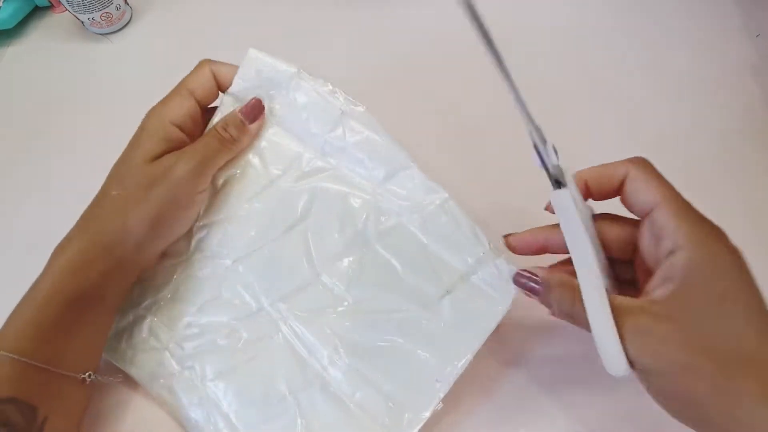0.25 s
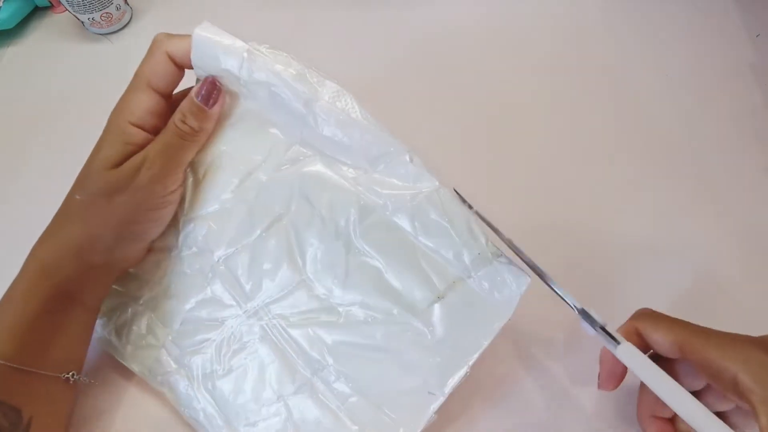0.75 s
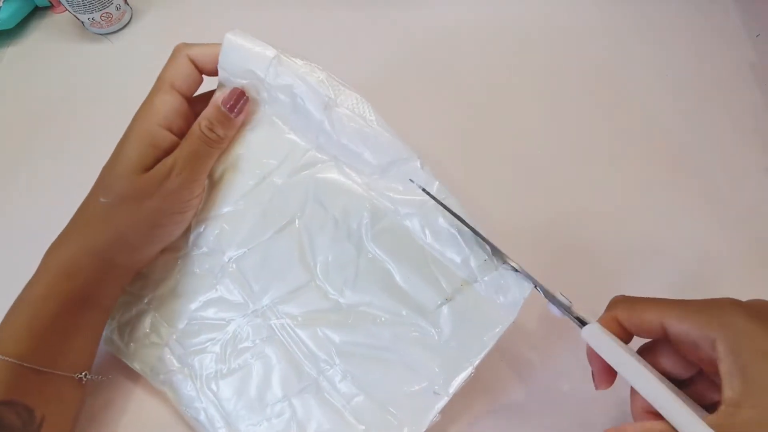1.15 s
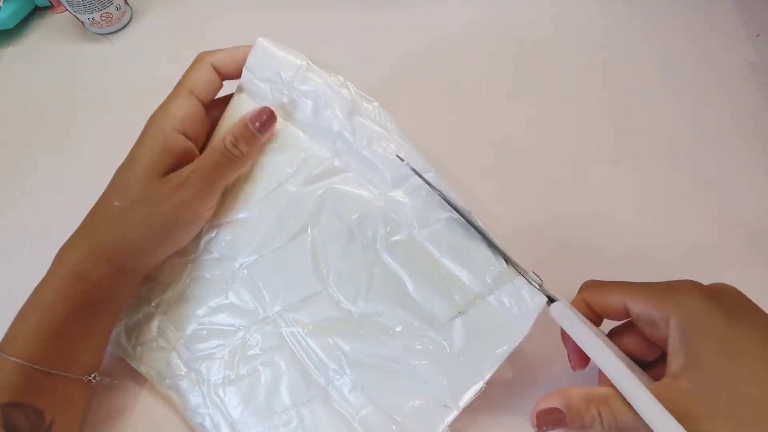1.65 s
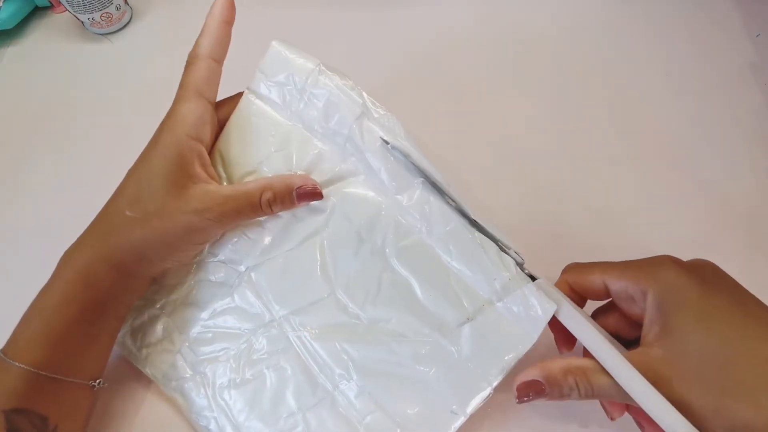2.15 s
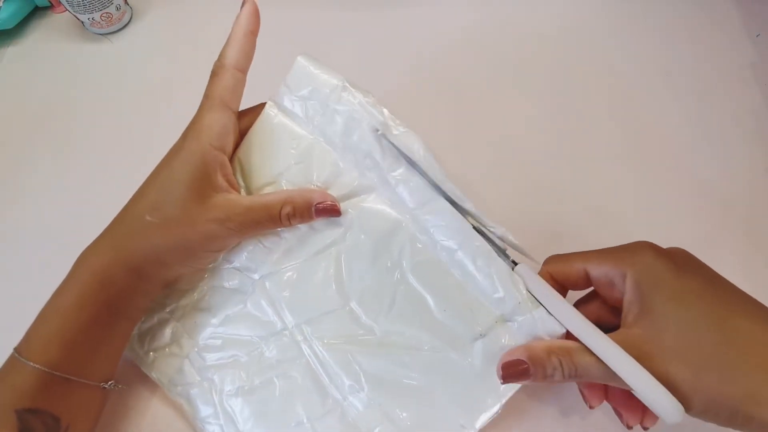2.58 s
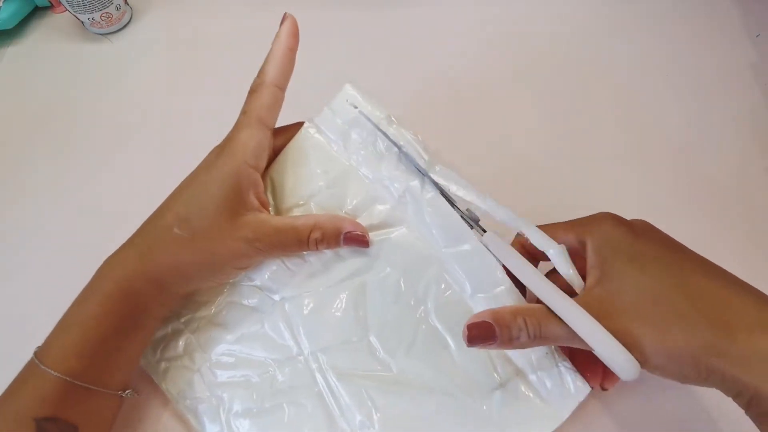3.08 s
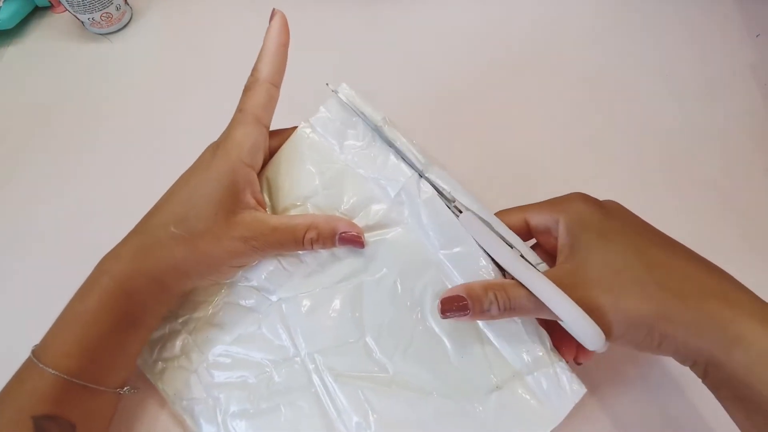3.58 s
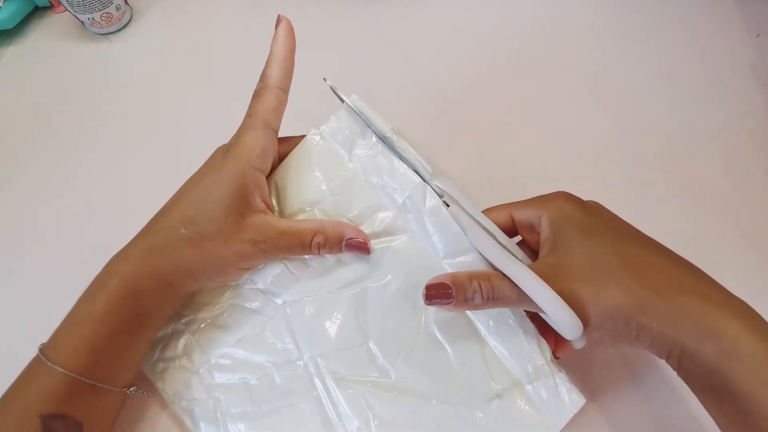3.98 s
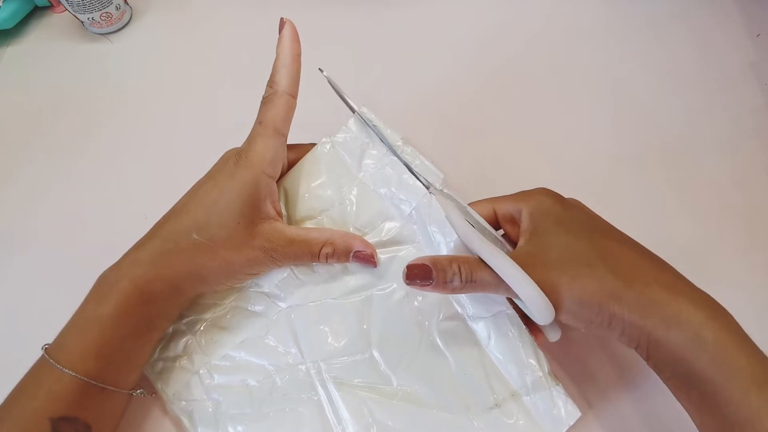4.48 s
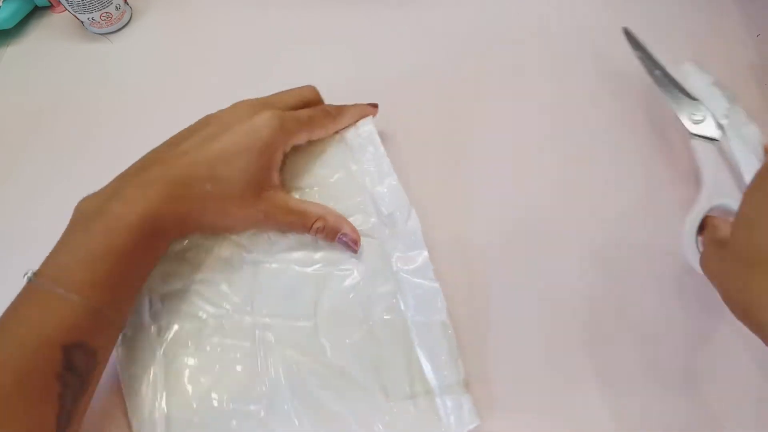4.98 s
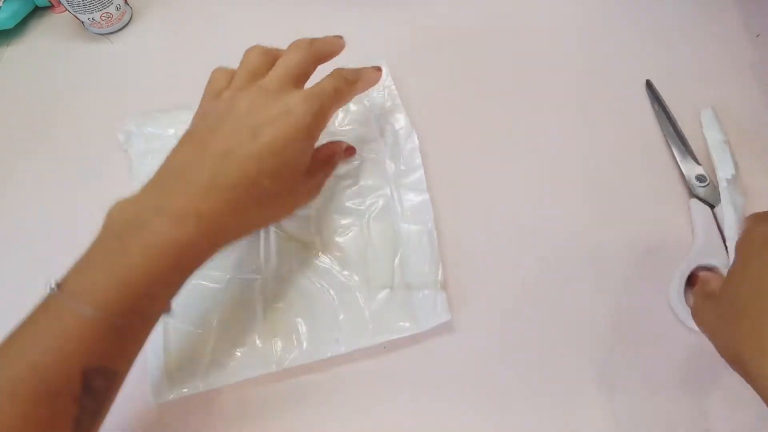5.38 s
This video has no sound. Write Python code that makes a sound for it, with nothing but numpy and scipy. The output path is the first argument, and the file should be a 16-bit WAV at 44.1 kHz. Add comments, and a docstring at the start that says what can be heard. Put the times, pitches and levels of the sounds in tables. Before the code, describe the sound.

A plastic pouch crinkles, then scissors snip and rasp through it in uneven cuts before knocking down on a table.

```python
"""A plastic mailing pouch crinkles and bumps softly as hands shift it on a table in a small room.
Then scissors cut along its top, close to a stereo microphone. The blades rasp open and shut in
thousands of tiny slips on the plastic film, and creases snap as they give way.
A last loud snip frees the strip; the pouch slides away and the scissors knock down on the table."""
import sys
import numpy as np
from scipy import signal
from scipy.fft import rfft, irfft
from scipy.io import wavfile
from scipy.ndimage import uniform_filter1d

SR = 44100
rng = np.random.default_rng(int(sys.argv[2]) if len(sys.argv) > 2 else 0)


def file_out(sig):
    """Save sig as 16-bit WAV at sys.argv[1]."""
    # one column per channel
    cols = np.atleast_2d(sig).T
    # limit, then scale
    lim = np.clip(cols, -1, 1)
    pcm = np.round(lim * 32767).astype(np.int16)
    wavfile.write(sys.argv[1], SR, pcm)


N = 248724

# The quiet room's tone. Each row: frequency in Hz, relative level in dB.
HUSH_TONE = [(12, -14), (25, 17), (42, 3.5), (105, 1), (170, -15), (250, -14), (330, -3), (470, -18.5),
             (780, -36), (1300, -20), (3600, -25), (8000, -49), (16000, -64)]
# The room's echo. Each row: frequency in Hz, seconds to fade by 60 dB.
ECHO_FADE = [(200, 0.47), (1000, 0.11), (4000, 0.28), (10000, 0.23), (16000, 0.33)]
# How alike the microphone's two sides sound. Each row: frequency in Hz, likeness from 0 to 1.
STEREO_LIKENESS = [(100, 0.92), (600, 0.83), (1400, 0.48), (3000, 0.24), (7000, 0.67), (15000, 1)]
# The stereo balance. Each row: frequency in Hz, how much louder the left is in dB.
LEFT_LEAN = [(60, -2), (200, -0.5), (600, 3), (2400, 3), (4400, 1.5), (8000, 0.6), (14000, 7)]
# Hands bump the pouch and table. Each row: start in seconds, level in dB, pitch in Hz.
HAND_BUMPS = [(0.032, -42, 212), (0.064, -41.5, 78), (0.305, -63, 300), (0.763, -49, 147),
              (1.195, -40, 376), (1.607, -49, 150.1), (2.151, -48, 172), (2.18, -51, 326),
              (2.526, -39.5, 135), (2.555, -44, 323), (2.587, -46.5, 204), (2.681, -53, 385),
              (2.745, -54, 193), (4.295, -37, 66.4), (4.451, -43.5, 55.3), (4.615, -37.5, 72.6),
              (4.832, -40.5, 67.5), (5.305, -32, 70.6), (5.534, -46.5, 162)]
# The scissors land and rock. Each row: start in seconds, relative level in dB.
SCISSOR_KNOCKS = [(5.288, -28.5), (5.328, -34)]
# The table's ringing notes. Each row: pitch in Hz, relative level in dB, seconds to fade by 60 dB.
TABLE_NOTES = [(69.1, -31, 0.047), (172.3, -3, 0.041), (351, -4.5, 0.14), (370.4, -4, 0.14),
               (498, -14, 0.11), (892, -1, 0.041)]
# The plastic film's tone. Each row: frequency in Hz, relative level in dB.
FILM_TONE = [(100, 18), (250, -6.5), (450, -2.5), (650, 1), (1000, 1), (1300, -5), (2500, -1), (4500, -2),
             (8000, -3.5), (12000, -1), (15000, -7), (16000, -12)]
# Where pouch and blades ring. Each row: pitch in Hz, width in Hz, boost in dB.
FILM_PEAKS = [(376, 28, 6.5), (780, 54, 5), (1580, 480, 5), (5840, 3800, 4), (6750, 240, 3.5)]
# Sharp snaps of film and blades. Each row: start in seconds, levels of the lows, middle and highs
# in dB, pitch in Hz of the facet (a small flat patch of film) that rings.
SHARP_SNAPS = [(0.03, -56, -50.5, -53, 2280), (0.0638, -61.5, -46.5, -49, 3200),
               (0.0904, -52.5, -46, -53, 2950), (0.1658, -38, -47.5, -53, 920),
               (0.1817, -45.5, -41, -56, 1320), (0.191, -67, -41, -53, 3180),
               (.2302, -47.5, -40, -42, 2840), (0.2606, -38.5, -38.5, -49, 620),
               (0.278, -59, -42.5, -57, 2830), (0.3052, -38, -38, -36.5, 704),
               (0.3866, -60, -46, -44, 6760), (0.4207, -55, -48, -37.5, 8400), (0.551, -54, -52, -75, 2170),
               (0.637, -66, -70, -45.5, 8950), (0.763, -49.5, -51, -46, 1000),
               (0.8018, -66, -60, -57, 9050), (1.0032, -59, -46.5, -54.5, 2960),
               (1.0784, -51, -50.5, -53, 807), (1.1319, -60, -52, -68, 603),
               (1.1967, -36.5, -37.5, -45, 1081), (1.2184, -69, -47.5, -55, 2820),
               (1.238, -72, -55.5, -65, 2890), (1.304, -80.5, -49, -51, 2320),
               (1.3368, -59, -45.5, -47.5, 3060), (1.3791, -47, -40.5, -37, 3247),
               (1.386, -57, -41, -41, 3470), (1.4443, -47.5, -46.5, -53, 820), (1.4598, -54, -49, -55, 850),
               (1.552, -51, -52, -55, 603), (1.6088, -43.5, -42, -41, 1670), (1.7061, -45, -50, -49, 785),
               (1.7869, -46.5, -40.5, -40.5, 2110), (1.8224, -50.5, -45, -44, 776),
               (1.9578, -52, -81, -48.5, 760), (2.1993, -42.5, -42, -39, 840),
               (2.221, -46.5, -57, -54, 900), (2.4204, -48, -47.5, -40.5, 746), (2.525, -36, -48, -40, 754),
               (2.5486, -46, -40.5, -42, 790), (2.628, -40, -40, -45, 820), (2.682, -46.5, -51, -50, 584.6),
               (2.7412, -69, -42, -62, 4540), (2.7743, -50, -51, -49, 781), (2.7998, -50, -42, -50, 5340),
               (2.8853, -50.5, -66, -56, 764), (2.9311, -52, -42, -38.5, 503), (2.9496, -40, -58, -56, 578),
               (3.0199, -45.5, -40.5, -36, 624), (3.0776, -44, -41.5, -39, 628),
               (3.133, -60, -39, -37.5, 2540), (3.155, -48, -47, -48, 600),
               (3.2108, -55, -51, -43.5, 10220), (3.2815, -53, -43, -42, 7400),
               (3.3212, -49.5, -43, -51, 2340), (3.4421, -59, -64, -44.5, 6690),
               (3.5397, -51.5, -46, -39.5, 10200), (3.5672, -55, -44, -34, 9100),
               (3.867, -53, -45.5, -43.5, 6470), (4.1332, -45, -41.5, -41, 1360),
               (4.345, -53, -42, -36.5, 5200), (4.37, -59, -43, -37, 6600), (4.632, -55, -38, -36.5, 5300),
               (4.6441, -35, -30, -27.5, 1640), (4.7778, -47, -56, -62, 790),
               (4.993, -41, -35.5, -42.5, 1640), (5.0138, -48, -53, -50, 1190),
               (5.2877, -38, -43.5, -38.5, 510), (5.3159, -45.5, -41, -55, 3900),
               (5.3279, -46.5, -60, -49, 472), (5.5236, -77, -51.5, -50, 6750)]
# Hands shift the pouch. Each row: start and length in seconds, hiss in dB, body (the lower sound) in dB
# above the hiss, pitch in Hz of the tightened panel of film, treble tilt in dB, grit from 0 to 1.
POUCH_RUSTLES = [(-0.002, 0.16, -53, -5, 2530, -2.5, 0.3), (0.145, 0.14, -43, -8.5, 1080, -7, 0.86),
                 (0.312, .075, -49, -6.5, 726, -6, 1), (0.422, .03, -47.5, -15, 720, -2.5, 0.5),
                 (0.467, 0.096, -63, -3, 694, -4.5, 0.67), (0.598, 0.066, -59, -6.5, 704, -3, 0.75),
                 (0.713, 0.07, -61, 3, 970, -5, 0.85), (0.968, 0.51, -60, -10, 700, -2.5, 0.63),
                 (1.2, 0.19, -59, -20, 712, -1, 1), (4.682, .08, -52, -3, 1580, 5, 0.23),
                 (4.767, 0.12, -44.5, -0.5, 1580, -5, .4), (4.888, 0.11, -48.5, -14.5, 1580, -3.5, 0.43),
                 (4.996, 0.25, -50, -5, 1078, 2, .25), (5.252, 0.061, -44.5, -11, 1870, -6.5, 0),
                 (5.313, 0.072, -51, -12, 500, -2, 0.2), (5.381, 0.18, -63.5, -22, 514, -2, 0.5)]
# The blades open and slide along the slit. Each row: start and length in seconds, hiss in dB,
# body in dB above the hiss, panel pitch in Hz, treble tilt in dB.
BLADE_SLIDES = [(1.514, 0.072, -48.5, -9, 684, -1.5), (1.949, 0.14, -49, -5.5, 771, -4),
                (2.317, .12, -48, -2.5, 777, 2.5), (2.47, 0.037, -54.5, -11, 770, -3.5),
                (2.846, 0.063, -53.5, -7.5, 780, -2), (3.42, 0.0866, -45, -9.5, 840, -0.5),
                (3.728, 0.11, -48, -2.5, 825, 0.5), (4.076, 0.036, -52, 1.5, 897, 2),
                (4.22, 0.043, -56, -5.5, 945, -5), (4.462, 0.13, -51.5, -7, 814, -2)]
# The blades close through the film. Each row: start and length in seconds, hardest bite as a share of
# the length, swell toward it in dB, hiss in dB, body in dB above the hiss, panel pitch in Hz,
# treble tilt in dB, grit from 0 to 1.
BLADE_CUTS = [(1.319, .13, 0.68, 8, -40, -13.5, 667, -3, 0.57),
              (1.598, .075, 1, 6.5, -43, -6, 674, -5, 0.2),
              (1.701, 0.15, 0.76, 6.5, -44, -5, 660, -0.5, 0.06),
              (2.138, 0.095, 0.61, 12, -39.5, -8.5, 736, -1, 0.13),
              (2.514, 0.12, .28, 8.5, -39, -1.5, 733, 0, 0.34),
              (2.664, 0.13, 0.84, 9, -39, -3.5, 502.4, -1, .7),
              (2.882, 0.11, 0.56, 15, -39, -4.5, 558, -2.5, 0.64),
              (3.047, 0.12, .45, 2.5, -44.5, -9.5, 612.6, 0.5, 0.51),
              (3.23, .1, 0.48, 2, -46, -6, 620, -3, 0.67), (3.557, 0.095, 0.5, 6, -45, 2, 2542, 2, 0.67),
              (3.883, .11, 0.18, 9, -43, -8, 1490, -4, 0.4),
              (4.115, 0.069, 0.45, 6.5, -43, -1, 940, 0, 0.34),
              (4.272, 0.073, 0.32, 6.5, -45.5, -4.5, 770, -1, 0.37),
              (4.607, 0.083, 0.33, 6.5, -41, -7.5, 1580, -2.5, 0.3)]

CUTOFF_HZ = 16200
STEP_S = 0.001  # time between points on a movement's curve
ONSET = SR // 100  # a snap's level is set over its first 10 ms


def amp(db):
    """Turns decibels into a gain."""
    return 10 ** (np.asarray(db) / 20)


def unit(x):
    """Scales a signal to an average (rms) level of 1."""
    return x / np.sqrt(np.mean(x ** 2) + 1e-20)


def read(points, hz):
    """Looks up a table by frequency, giving each octave equal room."""
    f, value = np.transpose(points)
    return np.interp(np.log(hz + 1), np.log(f), value)


def follow(curve, t):
    """Reads a movement's curve at times t."""
    return np.interp(t, np.arange(len(curve)) * STEP_S, curve)


def add(mix, s, sound):
    """Mixes a sound in at s seconds."""
    part = mix[:, max(round(s * SR), 0):][:, :sound.shape[-1]]
    part += sound[..., :part.shape[1]]


def band(x, low_hz, high_hz=SR / 2):
    """Keeps the sound between two frequencies."""
    edges_hz = [low_hz, min(high_hz, SR / 2 - 1)]
    return signal.sosfilt(signal.butter(3, edges_hz, "bandpass", fs=SR, output="sos"), x)


def stereo(sound, lag_s=0):
    """Three signals become two: both sides share the first (the left lag_s later) and get one each."""
    hz = np.fft.rfftfreq(sound.shape[1], 1 / SR)
    spectra = rfft(sound)
    likeness = np.clip(read(STEREO_LIKENESS, hz), 0, 1)
    shared = spectra[0] * np.exp(-2j * np.pi * hz * np.array([[lag_s], [0]]))
    return irfft(np.sqrt(likeness) * shared + np.sqrt(1 - likeness) * spectra[1:], sound.shape[1])


def room_hush(level_db=-59):
    """The room's steady low rumble and faint hiss."""
    tone = amp(read(HUSH_TONE, np.fft.rfftfreq(N, 1 / SR)))
    noise = irfft(rfft(rng.standard_normal((3, N))) * tone, N)
    return amp(level_db) * unit(stereo(noise))


def room_echo(x, first_echo_s=0.0049):
    """Sound bounces around the room, each frequency fading at its own speed."""
    hz, t, spectra = signal.stft(stereo(rng.standard_normal((3, SR // 2))), SR, nperseg=256)
    fade = amp(-60 * t / read(ECHO_FADE, hz)[:, None])
    tail = signal.istft(spectra * fade, SR, nperseg=256)[1]
    tail *= np.clip(np.arange(tail.shape[1]) / SR / first_echo_s - 1, 0, 1)
    return signal.fftconvolve(x, tail / np.linalg.norm(tail[0]), axes=1)[:, :N]


def bumps_and_knocks(bump_fade_s=0.089, bump_rise_s=0.00086, knock_trim_db=-4):
    """Soft hands make dull thuds; the hard scissors make the table top ring."""
    out, t = np.zeros((2, N)), np.arange(SR // 3) / SR
    for s, db, hz in HAND_BUMPS:
        noise = unit(band(rng.standard_normal((2, len(t))), hz / 2, hz * 2))
        thud = np.sin(2 * np.pi * hz * t) + 0.24 * noise
        add(out, s, thud * amp(db - 60 * t / bump_fade_s) * (1 - np.exp(-t / bump_rise_s)))
    ring = sum(amp(db - 60 * t / fade_s) * np.sin(2 * np.pi * hz * t) for hz, db, fade_s in TABLE_NOTES)
    for s, db in SCISSOR_KNOCKS:
        add(out, s, amp(db + knock_trim_db) * ring)
    return out


def film_response(size=2048):
    """How the pouch answers one tiny tap, with its own tone and ringing."""
    hz = abs(np.fft.fftfreq(size, 1 / SR))
    peaks_db = sum(boost / (1 + (2 * (hz - f) / width) ** 2) for f, width, boost in FILM_PEAKS)
    gain = amp(read(FILM_TONE, hz) + peaks_db)
    spectrum = np.exp(np.conj(signal.hilbert(np.log(gain))))  # no sound comes before the tap
    return np.fft.ifft(spectrum).real[:size // 2]


def buckle(film, facet_hz, facet_gain, ring_s, spike, lag_s, linger=0.17, size=2048):
    """One crease gives way: a click amid waves that scatter through the sheet and ring one facet."""
    t = np.arange(size) / SR
    burst = rng.standard_normal((3, size)) * (np.exp(-t / ring_s) + linger * np.exp(-t / 0.02))
    burst /= np.linalg.norm(burst, axis=1, keepdims=True)
    click_at = min(int(rng.random() * ring_s * SR / 2), size - 1)
    burst[0, click_at] += spike * rng.choice([-1, 1])
    notes_hz = [hz for hz in (facet_hz, 3.36 * facet_hz) if hz < CUTOFF_HZ]  # pitch and overtone
    burst += facet_gain * sum(signal.lfilter(*signal.iirpeak(hz, 8, fs=SR), burst) / 2 ** k
                              for k, hz in enumerate(notes_hz))
    together = rng.random() < 0.3  # some creases reach both sides at once, the rest reach the right side first
    return stereo(signal.fftconvolve(burst, film[None], axes=1), 0 if together else lag_s)


def stroke(start, length, attack_s, swell_db, bite=0.46, settle_s=0.021):
    """The gain of one movement: it sets in, swells to its hardest point, eases, and the film settles."""
    since = np.arange(0, N / SR, STEP_S) - start
    rise = np.exp(np.minimum(since / attack_s - 1, 0))
    arch_db = np.interp(since / length, [0, np.clip(bite, 0.01, 0.99), 1], [-swell_db, 0, -swell_db])
    settle = np.exp(-np.maximum(since - length, 0) / settle_s)
    return rise * amp(arch_db) * settle


def movements(slide_grit=0.19):
    """For every cut, slide and rustle: hiss power over time, body, panel pitch, tilt and grit."""
    rows = [(amp(db) * stroke(s, length, attack_s=0.0067, swell_db=swell, bite=bite), *texture)
            for s, length, bite, swell, db, *texture in BLADE_CUTS]
    rows += [(amp(db) * stroke(s, length, attack_s=0.0091, swell_db=3), *texture, slide_grit)
             for s, length, db, *texture in BLADE_SLIDES]
    rows += [(amp(db) * stroke(s, length, attack_s=0.019, swell_db=4.5), *texture)
             for s, length, db, *texture in POUCH_RUSTLES]
    gain, *texture = map(np.array, zip(*rows))
    return gain ** 2 + 1e-20, *texture


def crinkles(film, most_per_s=30):
    """Small creases give way at random: more often in gritty movements, louder in strong ones."""
    power, _, _, _, grit = movements()
    level = np.sqrt(power.sum(0))
    grittiness = grit @ power / power.sum(0)
    out = np.zeros((2, N))
    draws = rng.random((N // 220, 3))  # one chance every 5 ms
    gap_s = N / SR / len(draws)
    for k, (luck, softness, facet) in enumerate(draws):
        s = k * gap_s
        if luck < follow(grittiness, s) * most_per_s * gap_s:
            crease = buckle(film, facet_hz=700 * 14 ** facet, facet_gain=3.6, ring_s=0.0011,
                            spike=0.41, lag_s=0.00011)
            crease = band(crease, low_hz=400)
            crease /= np.sqrt(np.mean(crease[:, :ONSET] ** 2))
            add(out, s, follow(level, s) * amp(9 - 5 * softness) * crease)
    return out


def snaps(film, edges_hz=(200, 1300, 4500, SR / 2), high_trim_db=-0.26):
    """Big creases give way one by one, each with its own mix of lows, middle and highs."""
    out = np.zeros((2, N))
    for s, low_db, middle_db, high_db, hz in SHARP_SNAPS:
        snap = buckle(film, facet_hz=hz, facet_gain=2.13, ring_s=0.0053, spike=0.5,
                      lag_s=rng.normal(0.00013, 0.00004), linger=0.19)
        levels_db = [low_db, middle_db, high_db + high_trim_db]
        for low_hz, high_hz, db in zip(edges_hz, edges_hz[1:], levels_db):
            part = band(snap, low_hz, high_hz)
            add(out, s, amp(db) * part / np.sqrt(np.mean(part[:, :ONSET] ** 2)))
    return out


def tightened_film(x, share, panel_hz, tilt_db, boost_db=5.5, width=0.21, bass_db_per_octave=4.5):
    """Each grip tightens another panel of film, which rings and makes the sound brighter or duller."""
    hz, _, spectra = signal.stft(x, SR, nperseg=512)
    hz = hz[:, None]
    ring_db = boost_db / (1 + (2 * (hz / panel_hz - 1) / width) ** 2)
    # a small panel gives off little bass
    bass_db = bass_db_per_octave * np.clip(np.log2((hz + 1) / np.minimum(panel_hz, 1150)), -2, 0)
    slope_db = tilt_db * np.clip(np.log((hz + 1) / 5500) / np.log(3), -0.7, 0.6)
    t = np.arange(spectra.shape[2]) * 256 / SR
    grip = np.array([follow(row, t) for row in share])
    # small folds keep forming and opening, so narrow peaks in the tone come and go
    folds = uniform_filter1d(rng.standard_normal(spectra.shape[1:]), size=5, axis=0)
    folds_db = unit(uniform_filter1d(folds, size=9, axis=1)) * hz / (hz + 1500)
    gain = amp((ring_db + bass_db + slope_db) @ grip + folds_db)
    return signal.istft(spectra * gain, SR, nperseg=512)[1][:, :N]


def rasp(film, slips_per_s=2200, creases_per_s=14, creases=28, split_hz=1900, resting_db=-71):
    """Blades and skin slip on the film in tiny jerks: an even hiss when sliding, rough when tearing."""
    t = np.arange(N) / SR
    power, body_db, panel_hz, tilt_db, grit = movements()
    share = power / power.sum(0)  # the strongest movement counts most
    grittiness = follow(np.clip(grit, 0, 1) @ share, t)
    clumps = unit(uniform_filter1d(rng.standard_normal(N), 220))
    size_db = grittiness * (6 * np.minimum(rng.exponential(1, N), 4) + 3 * clumps)
    slips = (rng.random(N) < slips_per_s / SR) * amp(size_db) * rng.choice([-1, 1], N)
    slips /= np.sqrt(abs(uniform_filter1d(slips ** 2, 1400)) + 1e-9)  # the hand feeds energy steadily
    crease = (creases_per_s * t + 7 * rng.random(N)).astype(int) % creases  # only nearby creases sound
    grains = np.zeros((2, N))
    for k in range(creases):
        grain = buckle(film, facet_hz=2000 * 6 ** rng.random(), facet_gain=1.7, ring_s=0.0011,
                       spike=0.8, lag_s=rng.normal(0.00013, 0.00003))
        grains += signal.oaconvolve((slips * (crease == k))[None], unit(grain), axes=1)[:, :N]
    grains = tightened_film(grains, share, panel_hz, tilt_db)
    resting = amp(resting_db) ** 2  # film that is just being held still hisses faintly
    hiss = unit(band(grains, split_hz)) * np.sqrt(follow(power.sum(0) + resting, t))
    body = unit(band(grains, 163, split_hz)) * np.sqrt(follow(amp(body_db) ** 2 @ power + resting, t))
    return hiss + body


def scene(echo_db=-14):
    """Pouch, scissors and table, with the room's echo and hush."""
    film = film_response()
    near = rasp(film) + snaps(film) + bumps_and_knocks() + crinkles(film)
    return near + amp(echo_db) * room_echo(near) + room_hush()


def record(dry):
    """The microphone leans left above the bass and drops the deepest rumble and the highest treble."""
    lean_db = read(LEFT_LEAN, np.fft.rfftfreq(N, 1 / SR))
    gains = amp(np.array([lean_db, -lean_db]) / 2)
    gains /= np.sqrt(np.mean(gains ** 2, axis=0))
    heard = band(irfft(rfft(dry) * gains, N), low_hz=34)
    treble_cut = signal.firwin(511, CUTOFF_HZ, window=("kaiser", 9), fs=SR)
    return signal.oaconvolve(heard, treble_cut[None], "same", axes=1)


dry = scene()
out = record(dry)
file_out(out)
```